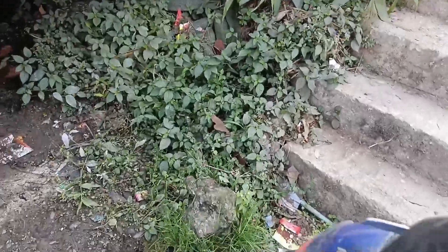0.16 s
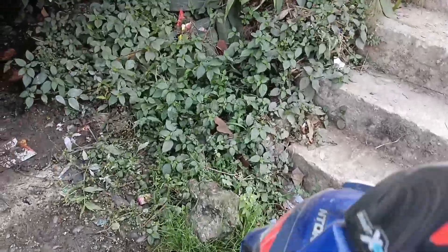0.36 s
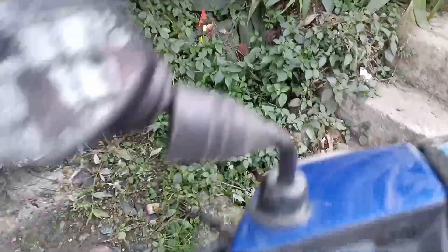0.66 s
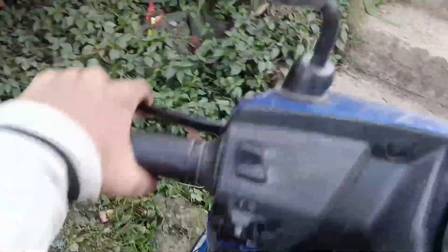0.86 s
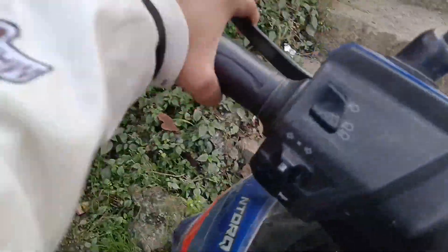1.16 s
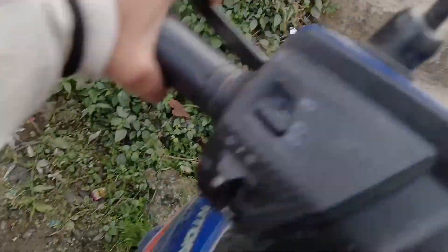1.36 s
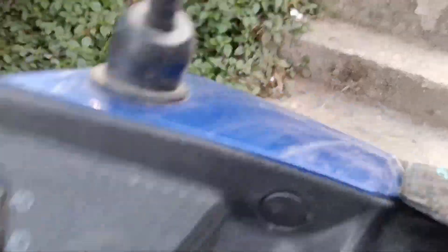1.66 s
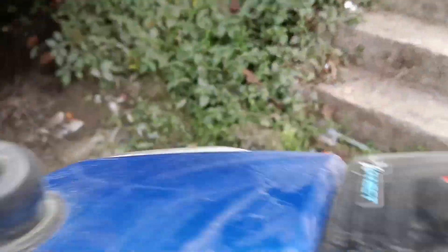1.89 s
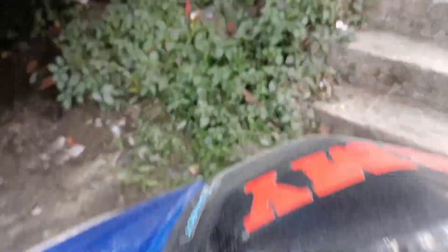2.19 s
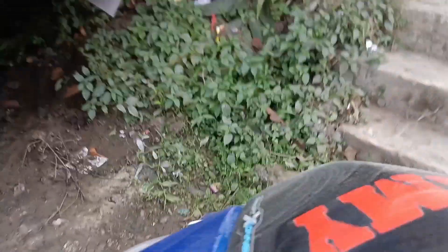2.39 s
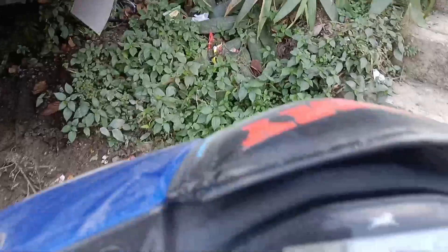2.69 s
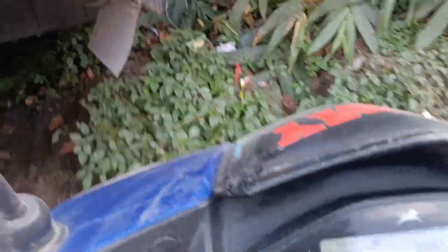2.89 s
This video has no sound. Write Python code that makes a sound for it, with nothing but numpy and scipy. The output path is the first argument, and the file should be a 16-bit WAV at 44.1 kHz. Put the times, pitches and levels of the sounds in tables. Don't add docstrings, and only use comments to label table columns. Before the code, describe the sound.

A parked single-cylinder scooter putters, jumps into a short rev, sinks to a slow uneven idle, then revs longer and harder before falling away; close phone microphone outdoors, slightly dull treble.

```python
import sys
import numpy as np
from scipy import signal
from scipy.fft import rfft, irfft
from scipy.io import wavfile
from scipy.ndimage import uniform_filter1d

SR = 44100
rng = np.random.default_rng(int(sys.argv[2]) if len(sys.argv) > 2 else 0)


def master_out(mix):
    frames = np.transpose(np.atleast_2d(mix))
    ceiling = np.clip(frames, -1, 1)
    pcm = np.round(ceiling * 32767).astype(np.int16)
    wavfile.write(sys.argv[1], SR, pcm)


def convert_level_to_amplitude(level_db):
    exponent = np.asarray(level_db, float) / 20
    return 10 ** exponent


N = 134505


def curve(table, col):
    rows = np.array(table, float)
    return np.interp(np.arange(N) / SR, rows[:, 0], rows[:, col])


def unit(x):
    return x / np.sqrt(np.mean(x ** 2))


def band(x, hz, width_hz):
    return signal.lfilter(*signal.iirpeak(hz, hz / width_hz, SR), x)


def band_twice(x, hz, width_hz):
    return band(band(x, hz, width_hz), hz, width_hz)


def noise():
    return rng.standard_normal(N)


def walk(rate_hz):
    hold = int(SR / rate_hz)
    steps = np.repeat(rng.standard_normal(N // hold + 1), hold)
    return 1.87 * uniform_filter1d(uniform_filter1d(steps, hold), hold)[:N]


def pulses(cycles, offset, lag_s, scatter_db, jitter_s):
    marks = np.arange(-1, int(cycles[-1]) + 1) + offset
    late, louder = rng.standard_normal((2, len(marks)))
    at = np.interp(marks, cycles, np.arange(N), right=2 * N)
    at = at + np.minimum(marks - cycles[0], 0) / (cycles[1] - cycles[0])
    lag_s = np.interp(at, np.arange(N), lag_s + np.zeros(N))
    at = at + (lag_s + jitter_s * late) * SR
    ok = (at >= 0) & (at < N)
    return np.bincount(at[ok].astype(int), convert_level_to_amplitude(scatter_db * louder[ok]), N)


def thump(clicks, hz, swell_s, turn=0):
    t = np.arange(int(18 * swell_s * SR)) / SR
    peak_s = 4 * swell_s
    swell = (t / peak_s) ** 4 * np.exp(4 - t / swell_s)
    ring = swell * np.exp(2j * np.pi * hz * (t - peak_s))
    shift = int(peak_s * SR)
    return signal.fftconvolve(clicks * np.exp(-1j * np.pi * turn), ring)[shift:shift + N].real


# time in seconds, four-stroke cycles per second.
SPEED_HZ = [(0.0, 19.56), (0.118, 23.5), (0.194, 31.74), (0.379, 36.29), (0.546, 37.81), (0.642, 27.04),
            (0.947, 18.19), (1.196, 16.18), (1.409, 13.65), (1.678, 13.05), (1.774, 18.06), (1.863, 29.47),
            (2.054, 38.62), (2.246, 41.21), (2.515, 41.82), (2.796, 41.05), (2.826, 31.84), (3.05, 20.97)]


def crank():
    hz = curve(SPEED_HZ, 1)
    return hz, .131 + np.cumsum(hz) / SR


# opens in seconds, opening time in seconds, shut in seconds,
# closing time in seconds, level in dB.
BLIPS = [
    (0.109, 0.13, 0.576, 0.08, -2.5),
    (1.739, 0.31, 2.8, 0.11, -0.5),
]


def throttle():
    t = np.arange(N) / SR
    opening, gain = 0, 0
    for opens_s, rise_s, shut_s, fall_s, db in BLIPS:
        ramp = np.clip(np.minimum((t - opens_s) / rise_s, (shut_s - t) / fall_s), 0, 1)
        opening = opening + ramp
        gain = gain + ramp * convert_level_to_amplitude(db)
    return opening, gain


# frequency in Hz, density in dB per Hz.
AIR_DB = [(150, -32), (250, -4.5), (409, -6), (670, -7), (1160, -24), (1580, -12), (2220, -33.5),
          (4480, -36.5), (7230, -56.5), (9400, -75), (15900, -120)]


def outdoors(opening):
    rows, air = np.array(AIR_DB, float), 0
    for hz in 260 * 2 ** np.arange(0, 4.7, 1 / 3):
        db = np.interp(np.log(hz), np.log(rows[:, 0]), rows[:, 1]) + 0.46 * walk(25)
        air = air + convert_level_to_amplitude(db) * band_twice(noise(), hz, hz / 3)
    rumble = unit(band_twice(noise(), 35, 50)) * convert_level_to_amplitude(-73.5 + 2.5 * opening + 2.0 * walk(24))
    return unit(air) * convert_level_to_amplitude(-78.5) + rumble


# start in seconds, pitch in Hz, length in seconds, level in dB.
CHIRRS = [(0.092, 1287, 0.035, -71), (0.091, 1860, 0.039, -70.5), (0.077, 3330, 0.065, -69),
          (.085, 4550, 0.13, -70), (0.651, 3290, 0.051, -63.5), (0.688, 4500, 0.047, -70),
          (.61, 1619, 0.078, -71), (0.632, 1277, 0.045, -65), (0.947, 3150, 0.015, -79),
          (0.965, 4640, .025, -82), (1.024, 4340, 0.029, -75), (1.027, 3850, 0.019, -76.5),
          (1.023, 5410, 0.021, -81), (1.117, 3230, 0.017, -85), (1.178, 4500, 0.022, -83),
          (1.327, 2346, 0.0051, -66), (1.336, 4520, 0.026, -86), (1.377, 1550, 0.014, -81),
          (1.455, 3160, .02, -90), (1.563, 4500, 0.036, -86), (1.7, 3210, .03, -81),
          (1.736, 2544, 0.053, -67), (1.738, 5370, 0.048, -87), (1.754, 3350, 0.047, -72),
          (1.781, 1414, .05, -62), (1.784, 4560, 0.073, -67.5), (2.8, 770, 0.11, -65),
          (2.798, 1110, 0.038, -66), (3.035, 4480, 0.032, -61)]


def chirrs():
    out, t = 0, np.arange(N) / SR
    for start_s, hz, length_s, db in CHIRRS:
        rise = (t - start_s) / 0.0035
        fall = (start_s + length_s - t) / 0.0074 + 1
        gate = np.clip(np.minimum(rise, fall), 0, 1)
        out = out + convert_level_to_amplitude(db) * gate * unit(band_twice(noise(), hz, 50))
    return out


# start in seconds, level in dB, pitch scale, brightness in dB.
KNOCKS = [
    (0.718, -30.5, 1.13, -49.5),
    (1.333, -48, 1.143, -27),
    (2.923, -28.5, 1.01, -10.5),
    (2.936, -37, 1.07, -9.5),
]
# pitch in Hz, level in dB, 60 dB decay in seconds, share of brightness 0-1.
PLASTIC = [(371, 0.5, 0.055, 0), (563, -7, .025, .9), (790, -8.5, 0.047, 0.3), (940, 0, 0.037, 0.8),
           (1150, -7, 0.022, .9), (1400, -17, .02, 0.8), (2210, -7, 0.017, 0.5), (2600, -5.5, 0.023, 0.9),
           (2850, -6, 0.034, 0.81), (4250, -20.5, 0.038, 0.96)]


def knocks():
    out, t = np.zeros(N + SR), np.arange(SR // 5) / SR
    for start_s, db, scale, bright_db in KNOCKS:
        ring = 0
        for hz, mode_db, t60_s, share in PLASTIC:
            level = convert_level_to_amplitude(db + mode_db + share * bright_db - 60 * t / t60_s)
            ring = ring + level * np.sin(2 * np.pi * hz * scale * t + rng.uniform(0, 2 * np.pi))
        onset = 1 - np.exp(-t * convert_level_to_amplitude(bright_db / 2) / 0.00021)
        start = int(start_s * SR)
        out[start:start + len(t)] += ring * onset
    return out[:N]


def whine():
    return unit(band(noise(), 4484, 60)) * convert_level_to_amplitude(-97 + 4 * walk(15))


# time in seconds, level in dB.
PANEL_DB = [(0, -23.5), (.1, -30), (.14, 4.5), (.55, 2.5), (.62, -4.5), (.67, 1.5), (.71, -2), (.8, 0.5),
            (.895, 6.5), (.93, -5), (1.01, -7.5), (1.04, -25), (1.8, -29.5), (1.86, 4), (2.78, 2),
            (2.9, -0.5), (2.98, -1), (3.04, -0.5)]


def panel(cycles, hz, opening):
    shake = noise() * (1.5 + np.exp(-(cycles % 1) / 1.8))
    centre_hz, width_hz = 618, 49
    buzz = unit(band(band(shake, centre_hz, width_hz), centre_hz, 2 * width_hz))
    db = -55.5 - 3 * opening + 6 * np.log10(hz / 20)
    return buzz * convert_level_to_amplitude(db + curve(PANEL_DB, 1) + 1.9 * walk(18))


# frequency in Hz, width in Hz, level in dB.
CASE_MODES = [(1289.5, 385, -0.5), (1587.5, 180, -6), (1966, 536, -6.5), (2698, 498, -9.5),
              (2882, 780, -7.5), (3350, 530, -6.5), (4342, 1040, -7.5), (4600, 480, -16), (5430, 690, -20),
              (6356, 500, -26.5), (7210, 970, -34)]
# time in seconds, level in dB.
STRAIN_DB = [(0, -2), (.07, 1.5), (.1, 5), (.25, 7), (.5, 7), (.62, 6), (.7, 0.5), (.76, 0.5), (.95, -1),
             (1.3, 1.5), (1.68, 4.5), (1.74, 9.5), (1.8, 11), (1.95, 9.5), (2.4, 10), (2.76, 9),
             (2.85, 3.5), (3.05, 4.5)]


def casing(cycles, hz, opening):
    beat = 1.0 + np.exp(-((2 * cycles + 0.37) % 1) / 0.83)
    patchy_db = 4.0 - 2.0 * opening
    taps = pulses(cycles, .2, 0, 2.0, .0001) + pulses(cycles, .65, 0, 3.0, .0002)
    taps = .25 * unit(taps)
    rustle = 0
    for mode_hz, width_hz, db in CASE_MODES:
        for part_hz in mode_hz + width_hz * np.array([-.45, -.1, .3]):
            part = unit(band_twice(noise() * beat + taps, part_hz, width_hz / 3))
            rustle = rustle + convert_level_to_amplitude(db + patchy_db * (walk(17) - 0.53 * patchy_db)) * part
    coast_s, idle_hz = 0.051, 15.77
    pull = 1 / (coast_s * SR)
    coast_hz = signal.lfilter([pull], [1, pull - 1], hz - hz[0]) + hz[0]
    speed_db = 61 * np.log10(np.maximum(hz, coast_hz) / idle_hz)
    return rustle * convert_level_to_amplitude(-86 + speed_db + curve(STRAIN_DB, 1))


# frequency in Hz, width in Hz, level in dB.
BOX_MODES = [(271, 80, 1.5), (500, 227, -13), (559, 47.5, 5), (691.6, 46.8, -1), (882, 143, -9)]
# time in seconds, effort in dB, brightness in dB per octave,
# second click share 0-1.
BREATH = [(0, -33.5, -6, 0.7), (.12, -26.5, -10, 0.1), (.2, -13, -1.5, 0.3), (.35, -6, -4.5, 0.4),
          (.52, -7.5, -5, 0.4), (.6, -23.5, -6, 0.4), (.7, -38.5, 4.5, 0.8), (1.76, -45.5, 7.5, .5),
          (1.86, -17.5, -12, 0.7), (1.96, -5.5, 0.5, 0.9), (2.1, -2.5, 0, 0.6), (2.28, 2.5, 1.5, 0.7),
          (2.45, -1.5, 2.5, .7), (2.6, 0.5, 7.5, 0.3), (2.74, 1.5, 6, 0.6), (2.8, -14.5, 4, .3),
          (2.87, -25, 7, 0), (3.05, -25.5, -2.5, 0)]


def air_box(cycles):
    valve_cycle = .6
    clicks = pulses(cycles, valve_cycle, 0, 1.5, .00009)
    clicks = clicks + curve(BREATH, 3) * pulses(cycles, valve_cycle + .5, 0, 2.0, .00012)
    spread_s = .017
    t = np.arange(int(4 * spread_s * SR)) / SR
    paths = rng.standard_normal((2, len(t))) * np.exp(-t / spread_s) * (1 - np.exp(-t / .003))
    shape = rfft(paths)
    paths = irfft(shape / np.abs(shape) ** .7, len(t))
    drift = .6 * walk(2.5)
    smeared = signal.fftconvolve(clicks * np.cos(drift), paths[0])[:N]
    smeared = smeared + signal.fftconvolve(clicks * np.sin(drift), paths[1])[:N]
    air = noise() * (1.1 + np.exp(-((cycles - valve_cycle) % 1) / 0.9))
    drive = convert_level_to_amplitude(-40) * unit(smeared) + convert_level_to_amplitude(-51) * unit(air)
    bright_db, box = curve(BREATH, 2), 0
    for k, (hz, width_hz, db) in enumerate(BOX_MODES):
        level = (-1) ** k * convert_level_to_amplitude(db + bright_db * np.log2(hz / 567))
        box = box + level * band_twice(drive, hz, 1.68 * width_hz)
    return convert_level_to_amplitude(curve(BREATH, 1) + 19) * box


def intake(cycles, gain):
    suck = pulses(cycles, 0, 0, .5, .00005) * gain
    gulp_s, echo_s, duct_lag_s = .0007, 0.01106, 0.00086
    t = np.arange(-400, 401) / SR
    gulp = signal.fftconvolve(suck, np.exp(-.5 * (t / gulp_s) ** 2), "same")
    gulp = gulp + convert_level_to_amplitude(-6.5) * np.roll(gulp, int(echo_s * SR))
    gulp = signal.sosfiltfilt(signal.butter(2, 61, "high", fs=SR, output="sos"), gulp)
    pump_gain = np.sqrt(np.clip(1.1 * gain - .25, 0, 1))
    pump = convert_level_to_amplitude(-33) * pump_gain * np.cos(4 * np.pi * cycles + 0.13)
    pump = pump + convert_level_to_amplitude(-63.5) * gain * np.cos(2 * np.pi * cycles)
    duct = convert_level_to_amplitude(-28.5) * thump(np.roll(suck, int(duct_lag_s * SR)), 174.2, 0.0036)
    return -convert_level_to_amplitude(-23) * gulp - pump - duct


# time in seconds, blow-down thump in dB, valve-closing thump in dB,
# gap between them in seconds.
EXHAUST = [(0, -32, -53.5, 0.014), (.15, -26, -34.5, 0.0086), (.3, -29.5, -37.5, 0.0093),
           (.5, -33, -39, 0.0083), (.58, -23.5, -41, 0.008), (.64, -31, -30.5, 0.0068),
           (.7, -29.5, -29.5, 0.0083), (1.0, -36, -34.5, 0.0096), (1.12, -33, -44, .018),
           (1.66, -33, -37.5, 0.02), (1.8, -28.5, -62, 0.014), (1.95, -29, -34.5, 0.013),
           (2.15, -45.5, -54, 0.0093), (2.74, -31, -55.5, 0.0083), (2.82, -23, -31, 0.0085),
           (2.92, -32, -29, 0.0072), (3.05, -32.5, -27.5, 0.0081)]
# time in seconds, loss in dB.
MISFIRES = [
    (1.175, -23),
    (1.3, -14),
    (1.44, -6),
]
# start in seconds, end in seconds.
LOADED_S = [
    (.11, .53),
    (1.76, 2.765),
]
# time in seconds, overrun 0-1.
OVERRUN = [(0, 0), (.585, 0), (.64, 1), (1.065, 1), (1.09, 0), (2.815, 0), (2.84, .5), (2.875, .6),
           (2.9, 1), (3.05, 1)]


def exhaust(cycles):
    t = np.arange(N) / SR
    loss_db = sum(db * (np.abs(t - at_s) < .02) for at_s, db in MISFIRES)
    loaded = sum((t > start_s) & (t < end_s) for start_s, end_s in LOADED_S)
    lag_s = 0.002 + .01 * (1 - loaded)
    over = curve(OVERRUN, 1)
    first = pulses(cycles, 0, lag_s - .002 * over, .8, .0002) * convert_level_to_amplitude(curve(EXHAUST, 1) + loss_db)
    second = pulses(cycles, 0, lag_s + curve(EXHAUST, 3), 1.2, .0003) * convert_level_to_amplitude(curve(EXHAUST, 2))
    both = thump(first * (1 - over), 128.4, 0.0024, over) - thump(second * (1 - over), 122.8, 0.0019)
    suck_hz, suck_s = 123, 0.0019
    both = both + thump(first * over, suck_hz, suck_s, .85 * over)
    both = both - thump(second * over, suck_hz, suck_s, .2 * over)
    return both + convert_level_to_amplitude(-4.5 + 4 * over) * band(both, 162.3, 13)


def scene():
    hz, cycles = crank()
    opening, gain = throttle()
    around = outdoors(opening) + chirrs() + knocks()
    covers = whine() + panel(cycles, hz, opening) + casing(cycles, hz, opening)
    breathing = air_box(cycles) + intake(cycles, gain)
    return (around + covers + breathing + exhaust(cycles))[None]


def band_limit(x):
    return signal.sosfilt(signal.butter(12, 15440, fs=SR, output="sos"), x)


def record(dry):
    dull = signal.sosfilt(signal.butter(4, 7640, fs=SR, output="sos"), dry)
    mix = dull + convert_level_to_amplitude(-90) * rng.standard_normal(dull.shape)
    return band_limit(mix)


dry = scene()
out = record(dry)
master_out(out)
```